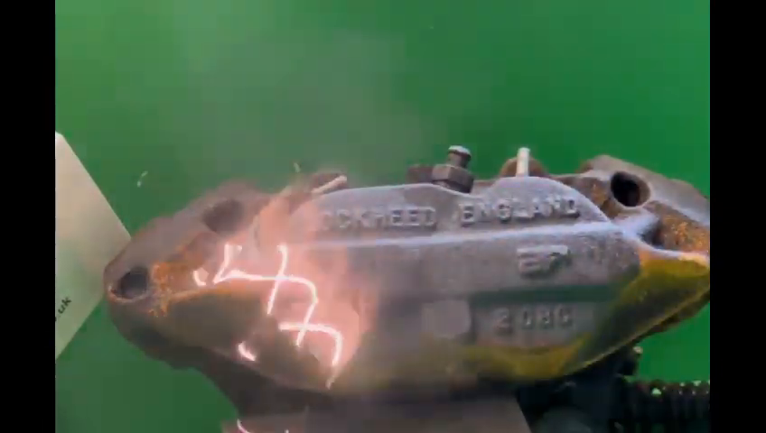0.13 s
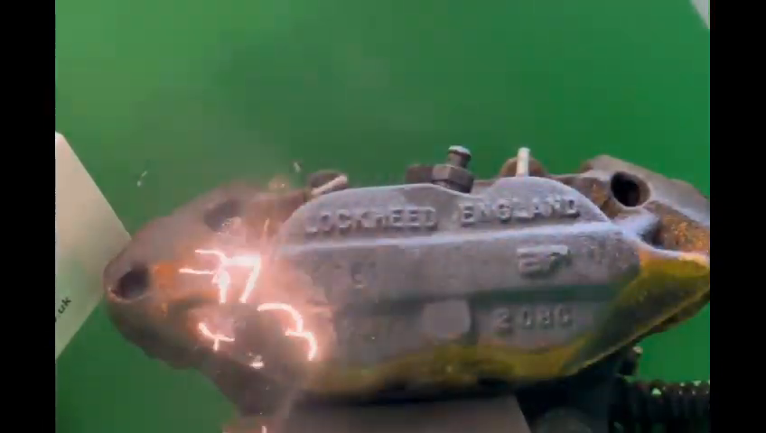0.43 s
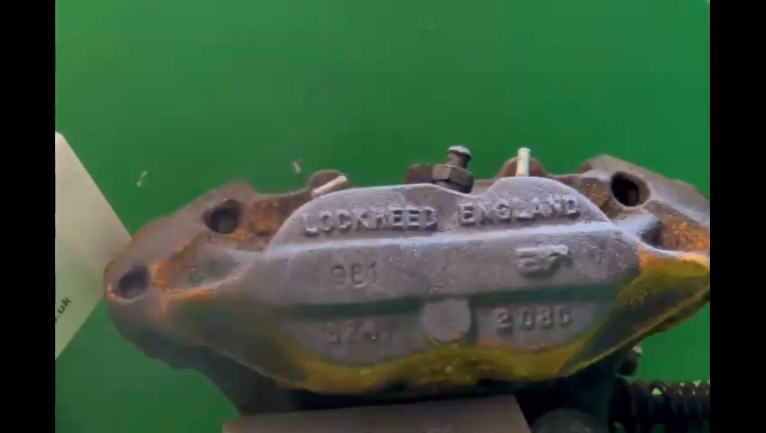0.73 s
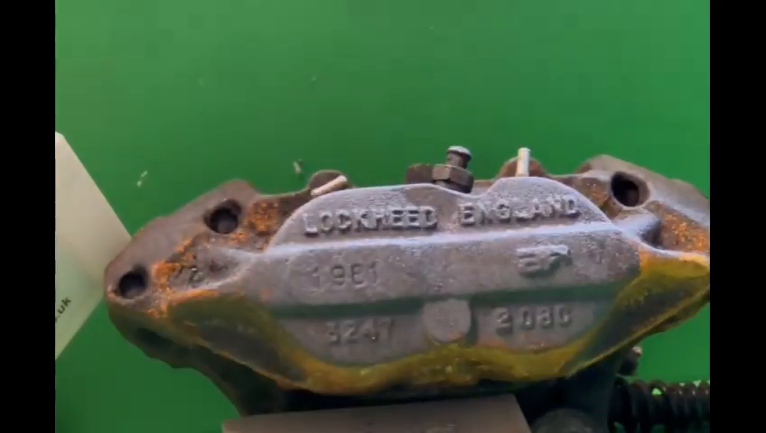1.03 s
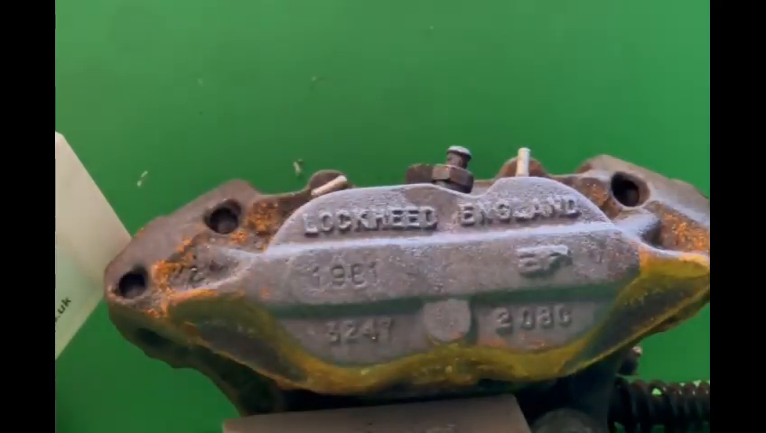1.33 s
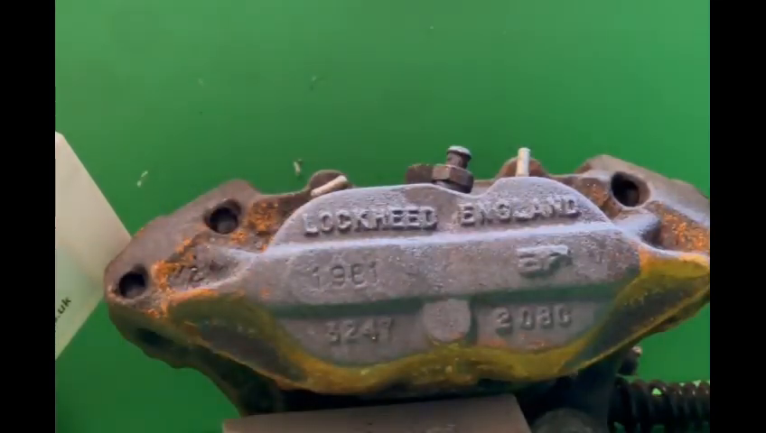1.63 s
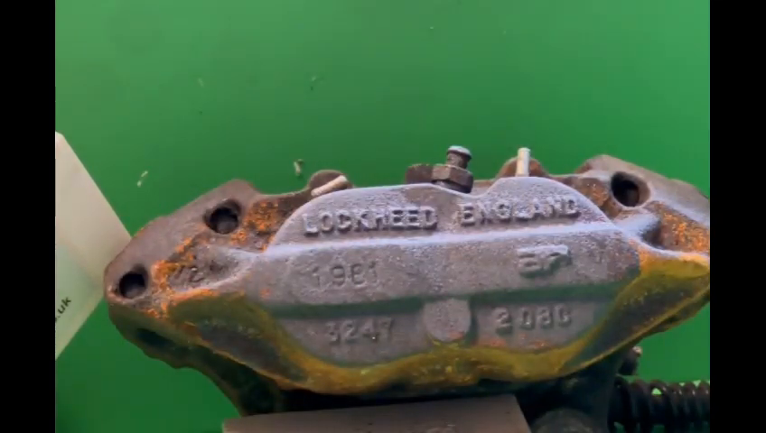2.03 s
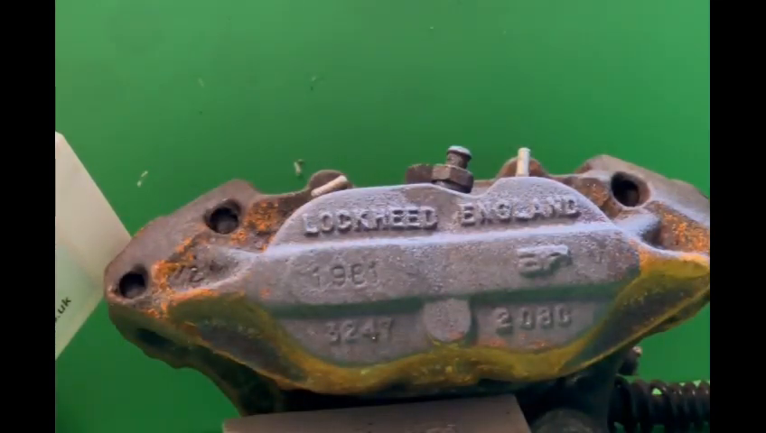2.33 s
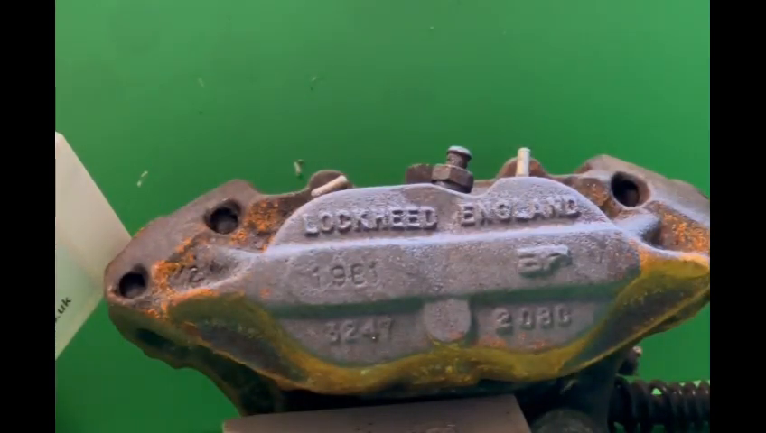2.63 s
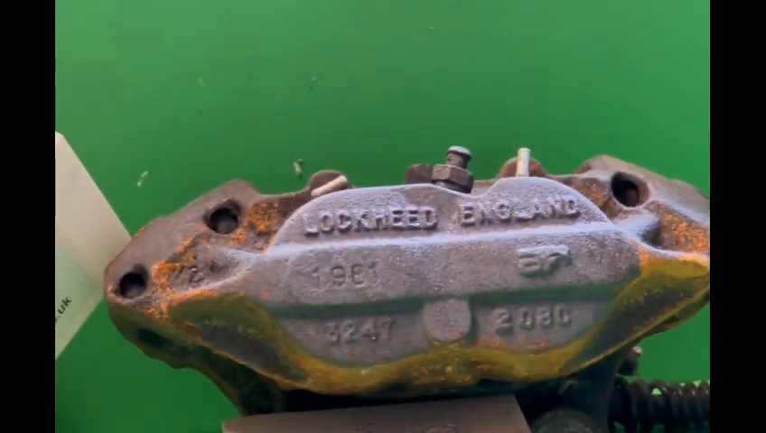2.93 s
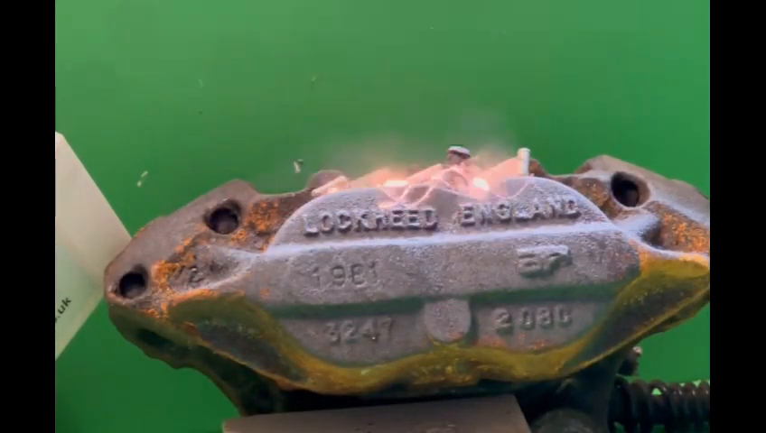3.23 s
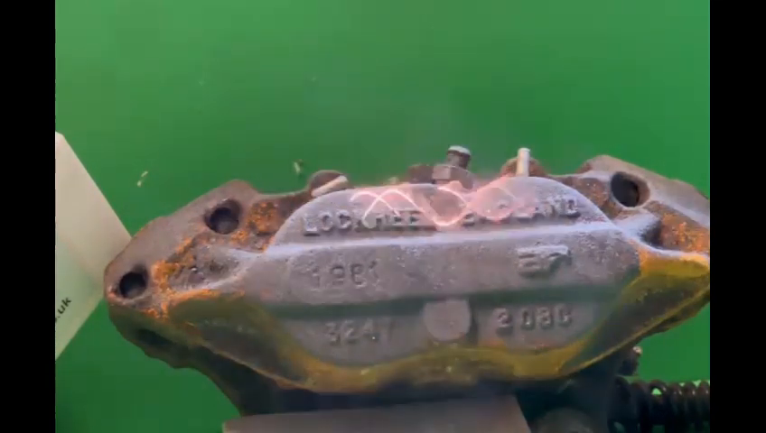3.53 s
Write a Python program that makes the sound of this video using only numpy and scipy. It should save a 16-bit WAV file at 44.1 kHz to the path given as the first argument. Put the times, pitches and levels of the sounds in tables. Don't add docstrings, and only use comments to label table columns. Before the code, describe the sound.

Steady extractor whine and air roar, with two buzzing, crackly laser sweeps on a rusty casting.

```python
import sys
import numpy as np
from scipy import signal
from scipy.fft import rfft, irfft
from scipy.io import wavfile
from scipy.ndimage import uniform_filter1d

SR = 44100
rng = np.random.default_rng(int(sys.argv[2]) if len(sys.argv) > 2 else 0)


def wrap_up_sound(samples):
    columns = np.atleast_2d(samples).T
    tamed = np.clip(columns, -1, 1)
    steps = np.round(tamed * 32767).astype(np.int16)
    wavfile.write(sys.argv[1], SR, steps)


def nominal_scale(level):
    x = np.asarray(level, float) / 20
    return 10 ** x


N = 161847
PORT_LAG_S = 15 / SR
# pitch_hz, level_db
KEPT = [(1800, -1.5), (2050, -26), (4400, -19.5), (6800, -4.5), (7000, -5.5), (7950, -5), (8150, -20.5),
        (9800, 5)]


def read(points, hz):
    f, value = np.transpose(points)
    return np.interp(np.log(hz + 1), np.log(f + 1), value)


def evened(x):
    return x / np.sqrt(np.mean(x ** 2) + 1e-20)


def drift(rate_hz, count):
    hz = np.fft.rfftfreq(2048, 128 / SR)
    spectra = rfft(rng.standard_normal((count, 2048))) / (1 + (hz / rate_hz) ** 2)
    curves = irfft(spectra)
    return np.array([np.interp(np.arange(N) / 128, np.arange(2048), evened(row)) for row in curves])


def ports(level_db, patchy_db):
    # pitch_hz, level_db
    lean_table = [(100, -1.5), (500, -0.5), (750, 8), (920, 9), (1100, -2), (1700, -6), (1900, 0),
                  (11000, 5.5)]
    # pitch_hz, likeness (0 to 1)
    alike_table = [(100, 0.92), (270, 0.94), (450, 0.19), (750, 0.94), (1000, 0.37), (1350, 0.66),
                   (1700, 1), (2100, 0.63)]
    frames, hz = N // 256 + 5, np.fft.rfftfreq(1024, 1 / SR)[:, None]
    a, b, c, d, patches = rng.standard_normal((frames, 513, 5)).T
    patches = uniform_filter1d(patches, size=10, axis=0)
    patches = evened(uniform_filter1d(patches, size=12, axis=1))
    shared, other = a + 1j * b, c + 1j * d
    alike = np.clip(read(alike_table, hz), 0, 1)
    lean = nominal_scale(read(lean_table, hz) / 2)
    late = np.exp(-2j * np.pi * hz * PORT_LAG_S)
    left = shared * lean
    right = (alike * shared + np.sqrt(1 - alike ** 2) * other) * late / lean
    mid = left + right
    side = (left - right) * nominal_scale(read(KEPT, hz))
    z = np.array([mid + side, mid - side]) * nominal_scale(level_db(hz) + patchy_db * patches)
    return evened(signal.istft(z, nperseg=1024, noverlap=768)[1][:, :N])


def whine():
    # time_s, eighth_order_hz
    speed = [(0, 2586.4), (.8, 2586.7), (1.4, 2587.3), (1.7, 2588), (2.05, 2591), (2.35, 2589),
             (2.65, 2589.1), (2.85, 2589.9), (3.3, 2587.5), (3.67, 2586.4)]
    # order, level_db, left_right_db, right_leads_rad
    shaft_orders = [(1, -39.6, -0.8, -1.35), (2, -53.5, 1.1, 0.25), (3, -39.8, 11.9, -1.71),
                    (4, -41.3, -3.9, -1.85), (5, -30.3, -11.2, 3.05), (6, -40.5, 1.1, 0.35),
                    (7, -38.1, -0.6, -0.13), (8, -29.5, 0.3, -0.32), (9, -46.4, 2.1, -0.26),
                    (10, -52.0, 0.4, -0.04), (11, -47.5, 0.6, -0.05), (12, -37.0, -0.1, -0.15),
                    (13, -54.8, -0.1, -0.0), (14, -50.7, -0.0, -0.01), (15, -51.6, 0.2, -0.01),
                    (16, -31.1, -0.0, -0.16), (17, -49.7, -0.1, -0.01), (18, -49.4, 0.1, 0.0),
                    (19, -52.8, 0.0, 0.0), (20, -51.2, 0.0, -0.02), (21, -55.1, 0.0, 0.0),
                    (22, -51.6, 0.3, -1.89), (24, -41.4, -0.0, 2.02), (26, -40.6, -0.0, 0.09),
                    (27, -48.5, -0.1, 0.02), (32, -35.4, -0.1, 2.57), (33, -50.3, 0.1, 3.14)]
    waver_db, waver_hz = 0.69, 4.1
    fuzz, fuzz_hz = 0.11, 2.9
    start_spread = 0.54
    shaft_hz = np.interp(np.arange(N) / SR, *np.transpose(speed)) / 8
    turn = 2 * np.pi * np.cumsum(shaft_hz) / SR
    slow = drift(waver_hz, count=len(shaft_orders))
    wander = fuzz * drift(fuzz_hz, count=1)[0]
    starts = start_spread * rng.random(len(shaft_orders))
    out = np.zeros((2, N))
    for (k, db, lean_db, lead), wave, start in zip(shaft_orders, slow, starts):
        phase = round(k) * turn + np.sqrt(k) * wander + 2 * np.pi * start
        share = np.sqrt(4 / (1 + nominal_scale([[-2 * lean_db], [2 * lean_db]])))
        out += share * nominal_scale(db + waver_db * wave) * np.sin(phase + np.array([[0], [lead]]))
    return out


def laser():
    # start_s, end_s, level_db, sizzle_db, growth_db_per_s
    sweeps = [
        (-.05, .795, -1.5, -25.5, 1.5),
        (3.23, 3.51, 1.5, -26, 3),
    ]
    # scan_rate_multiple, first_sweep_db, second_sweep_db
    harmonics = np.array([(2, -52, -59), (3, -51, -61), (4, -41, -67), (5, -53, -62), (6, -44, -53),
                          (7, -60, -56), (8, -45, -44), (9, -51, -44), (10, -63, -56), (11, -56, -47),
                          (12, -62, -58), (13, -59, -58), (14, -58, -53), (15, -62, -53), (16, -57, -65),
                          (17, -57, -59), (19, -54, -60), (21, -54, -71), (23, -58, -62), (25, -55, -68),
                          (27, -63, -70), (29, -53, -58), (31, -62, -68), (33, -64, -67), (35, -63, -66),
                          (36, -55, -57), (37, -60, -48), (38, -63, -56), (39, -61, -46), (40, -55, -49),
                          (41, -61, -49), (42, -67, -50), (43, -58, -61), (44, -54, -55), (45, -56, -52),
                          (46, -58, -48), (47, -52, -52), (48, -62, -53), (49, -54, -55), (50, -68, -49),
                          (51, -56, -64), (52, -50, -62), (53, -57, -68), (54, -53, -63), (55, -55, -60),
                          (56, -54, -61), (57, -63, -67), (58, -60, -52), (59, -60, -47), (60, -53, -63),
                          (61, -53, -65), (62, -54, -66), (68, -60, -62), (80, -62, -63), (95, -60, -62),
                          (116, -59, -58)])
    # pitch_hz, level_db
    buzz_lean = [(190, -1.5), (380, 3.5), (430, 9), (520, 0), (900, -0.5), (1100, 0), (1800, -8),
                 (1950, 5.5)]
    # time_s, low_buzz_db, high_buzz_and_sizzle_db
    bite = [
        [(0, 3, 2), (.06, 0, 0), (.2, -1, -.5), (.4, 0, 1), (.5, 0, -1), (.62, 0, 0), (.76, 1, 0), (.8, 1, 0)],
        [(3.22, -4, 0), (3.26, 1, 1.5), (3.31, 2, -1), (3.37, 0, -1), (3.435, 0, 3), (3.485, -1, -1),
         (3.505, -7, -2)],
    ]
    # pitch_hz, level_db
    plasma = [
        [(80, -5.5), (200, -21), (500, -4), (1200, -15), (2200, -16), (5000, 0), (9000, 1.5), (11700, -5.5)],
        [(80, -9), (300, -8), (600, -13), (1200, -3), (2100, 5), (5000, 9), (9000, 8.5), (11700, 5)],
    ]
    scan_hz, scan_wobble, bite_split_hz = 47.52, .03, 1200
    edge_s, flutter_db, flicker_db = .02, .5, 1.5
    sizzle_patchy_db, gate_depth = 2.5, .4

    t, out = np.arange(N) / SR, np.zeros((2, N))
    orders = np.arange(2, 121)
    hz = scan_hz * orders
    lean = nominal_scale(read(buzz_lean, hz) / 2)
    late = np.exp(-2j * np.pi * hz * PORT_LAG_S)
    apart = (lean - late / lean) / (lean + late / lean) * nominal_scale(read(KEPT, hz))
    apart = apart / np.maximum(abs(apart), 1)
    for j, (start, end, db, sizzle_db, rise_db) in enumerate(sweeps):
        on = np.clip(np.minimum(t - start, end - t) / edge_s + .5, 0, 1)
        live = on > 0
        s, low_db, high_db = np.transpose(bite[j])
        low, high = nominal_scale(np.interp(t, s, low_db)), nominal_scale(np.interp(t, s, high_db))

        scatter = np.where(orders > 62, 3 * rng.standard_normal(len(orders)), 0)
        size = np.sqrt(2) * nominal_scale(np.interp(orders, harmonics[:, 0], harmonics[:, j + 1]) + scatter)
        phase = 2 * np.pi * (hz[:, None] * t[live] + rng.random((len(orders), 1)))
        phase = phase + scan_wobble * orders[:, None] * drift(7.0, count=1)[:, live]
        flicker = nominal_scale(flicker_db * drift(8., count=12)[:, live])[orders % 12]
        flicker = flicker * np.where(hz[:, None] < bite_split_hz, low[live], high[live])
        buzz = np.zeros((2, N))
        port_sizes = size * np.array([1 + apart, 1 - apart])
        buzz[:, live] = (port_sizes @ (flicker * np.exp(1j * phase))).imag

        gate = 1 + gate_depth * np.cos(4 * np.pi * scan_hz * t)
        noise = ports(lambda hz: read(plasma[j], hz), sizzle_patchy_db)
        sizzle = nominal_scale(sizzle_db) * np.sqrt(high) * gate * noise
        growth_db = rise_db * on * (t - (start + end) / 2)
        out += on * nominal_scale(db + growth_db + flutter_db * drift(12, count=1)) * (buzz + sizzle)
    return out


def puffs():
    # start_s, peak_db, start_hz, length_s
    pops = [
        (.457, -26, 600, .018),
        (.574, -27, 560, .028),
        (.762, -28, 520, .027),
        (.527, -33, 300, .018),
        (.684, -31, 380, .022),
        (.556, -34, 180, .018),
        (.793, -31, 200, .02),
        (.648, -34, 160, .018),
    ]
    end_hz = 65
    t, out = np.arange(N) / SR, np.zeros(N)
    for s, db, top_hz, length in pops:
        u = np.clip((t - s) / length, 0, 1)
        hz = top_hz * (end_hz / top_hz) ** u
        swell = np.sin(np.pi * u ** 0.85) ** 2
        out += nominal_scale(db) * swell * np.sin(2 * np.pi * np.cumsum(hz * (u > 0)) / SR)
    return out


def air():
    # pitch_hz, level_db
    roar_table = [(15, -53), (25, 2.5), (264, -9.5), (322, -11.5), (544, -16), (972, -10), (1160, -7.5),
                  (1590, -5), (1900, -7), (2470, -22), (4180, -120)]
    hiss_table = [(1500, -23.5), (2000, -1.5), (3000, -3), (5100, 4.5), (6500, -5.5), (8400, 1.5),
                  (9600, -6.5), (11600, -15.5)]
    # pitch_hz, width_hz, lift_db
    resonances = [(1015, 34, 2.5), (1160, 87, -9), (1380, 470, 2.5), (1830, 127, 7), (2274, 400, 3),
                  (3050, 96, -6), (3760, 66, -14.5), (3930, 43, -3.5), (4530, 52, -9), (5430, 73, -20),
                  (5880, 290, -2), (7690, 180, -8.5), (8620, 130, 3)]
    roar_db, hiss_db, patchy_db, swell_db = -33.5, -29.5, 1.5, .15

    def duct(hz):
        return sum(db / (1 + (2 * (hz - f) / w) ** 2) for f, w, db in resonances)

    def roar_level(hz):
        return np.where(hz > 2300, -55.5, read(roar_table, hz)) + duct(hz)

    roar = ports(roar_level, patchy_db)
    hiss = ports(lambda hz: read(hiss_table, hz) + duct(hz), patchy_db)
    return (nominal_scale(roar_db) * roar + nominal_scale(hiss_db) * hiss) * nominal_scale(swell_db * drift(4.9, count=1))


def scene():
    return whine() + laser() + puffs() + air()


def top_cut(x):
    return signal.sosfilt(signal.butter(12, 11800, fs=SR, output="sos"), x)


def record(dry):
    # pitch_hz, level_db
    sum_floor = [(7050, -76), (7230, -53), (7680, -53), (7720, -76), (9050, -68), (9250, -61.5),
                 (9900, -56), (10600, -42)]
    difference_floor = [(1950, -90), (2100, -75), (4400, -68), (5700, -69), (5900, -57), (6900, -56),
                        (7050, -64), (7900, -63), (8100, -60), (9200, -53), (9800, -54.5), (11600, -56)]
    # sum_db, difference_db
    jitter_db = [2.5, 3.5]
    # start_s, end_s, from_hz, to_hz, drop_db
    sinks = [
        (0, .05, 7100, 7750, 25),
        (.4, .44, 7100, 7750, 25),
        (1.235, 1.27, 9000, 11750, 28),
        (2.55, 2.59, 7100, 7750, 20),
        (3.365, 3.4, 10550, 11050, 25),
        (3.55, 3.59, 10800, 11150, 30),
    ]
    # start_s, end_s
    gaps = [(.247, .285), (.39, .396), (.482, .489), (.598, .65), (.692, .696), (.743, .746),
            (1.089, 1.113), (1.295, 1.3), (1.412, 1.419), (1.481, 1.486), (1.625, 1.644), (1.929, 1.972),
            (2.04, 2.064), (2.272, 2.318), (2.527, 2.646), (3.06, 3.087)]
    # from_hz, to_hz
    line_from_hz, line_to_hz = (10280, 10400)
    low_cut_hz, gap_margin_s = 68, .008
    hole_db, hole_from_hz = 5., 1900

    cut = signal.sosfilt(signal.butter(3, low_cut_hz, "high", fs=SR, output="sos"), dry)
    hz, t, z = signal.stft([cut[0] + cut[1], cut[0] - cut[1]], SR, nperseg=2048, noverlap=1536)
    band, centre = np.minimum(np.arange(len(hz)) // 4, 255), hz[2::4]
    power = (abs(z[:, :-1] / 2) ** 2).reshape(2, 256, 4, -1).mean(axis=2)
    power_db = 10 * np.log10(uniform_filter1d(power, size=3, axis=2) + 1e-20)
    usual_db = signal.medfilt(np.median(power_db, axis=2), (1, 9))
    hole_floor_db = usual_db - hole_db - 50 * (centre < hole_from_hz)
    set_floor_db = [read(sum_floor, centre), read(difference_floor, centre)]
    floor_db = np.maximum(set_floor_db, hole_floor_db)[:, :, None]

    frames = power.shape[2]
    jitter = rng.standard_normal((frames // 3 + 1, 128, 2)) * jitter_db
    jitter = jitter.T.repeat(2, axis=1).repeat(3, axis=2)[:, :, :frames]
    sink_db = sum(db * np.outer((centre > lo) & (centre < hi), (t > a) & (t < b)) for a, b, lo, hi, db in sinks)
    keep = np.clip(power_db - floor_db + jitter + sink_db, 0, 1)
    closed = sum((t > a - gap_margin_s) & (t < b + gap_margin_s) for a, b in gaps)
    keep[0, (centre > line_from_hz) & (centre < line_to_hz)] = 1 - closed
    mid, side = signal.istft(z * keep[:, band], SR, nperseg=2048, noverlap=1536)[1][:, :N] / 2
    return top_cut(np.array([mid + side, mid - side]))


dry = scene()
out = record(dry)
wrap_up_sound(out)
```